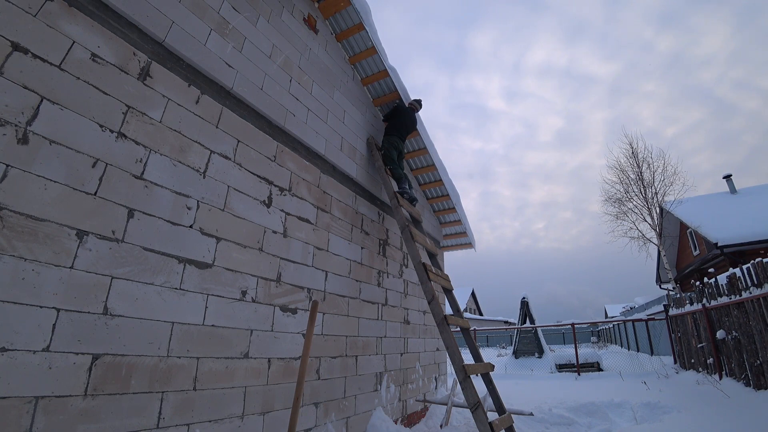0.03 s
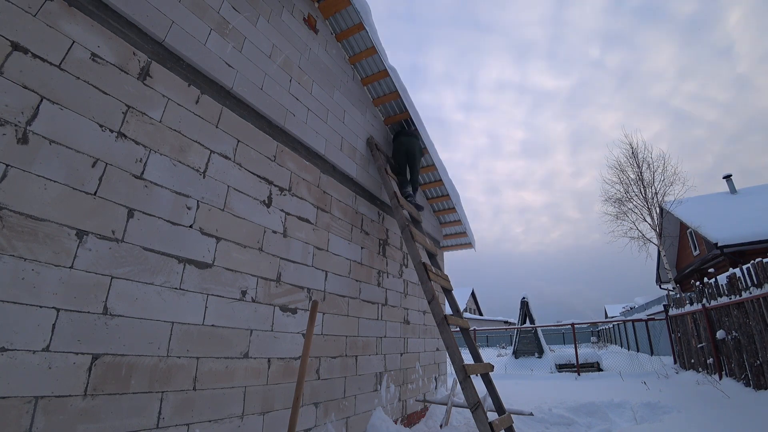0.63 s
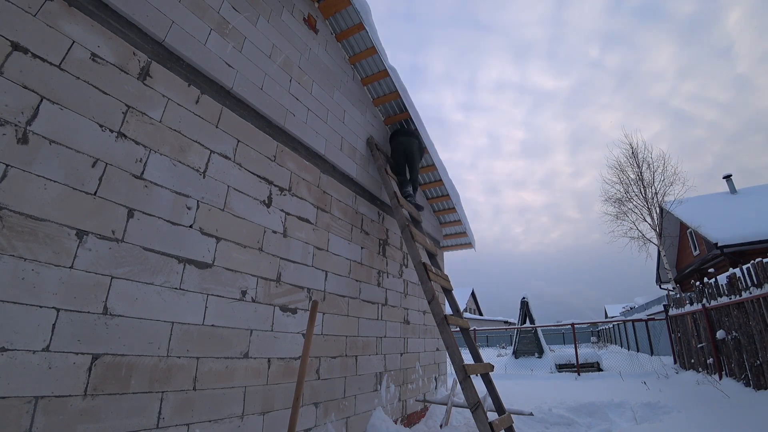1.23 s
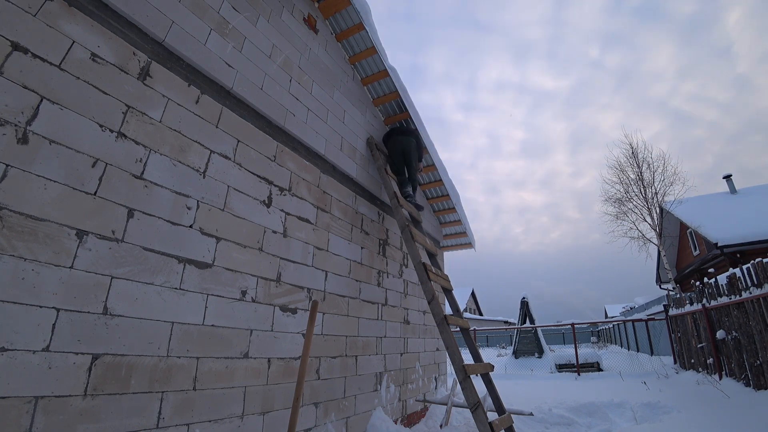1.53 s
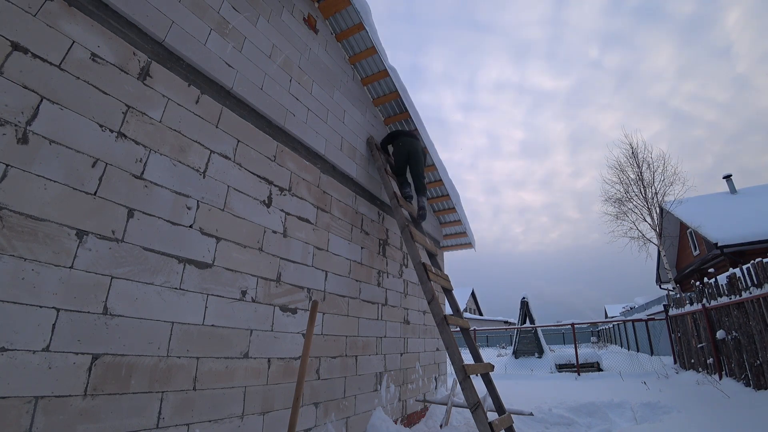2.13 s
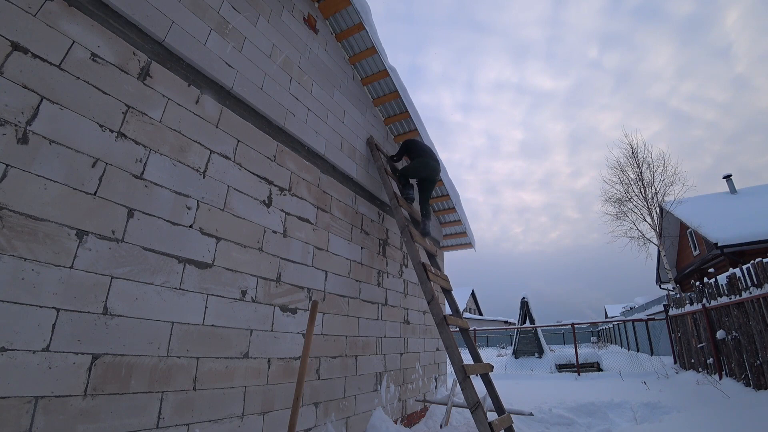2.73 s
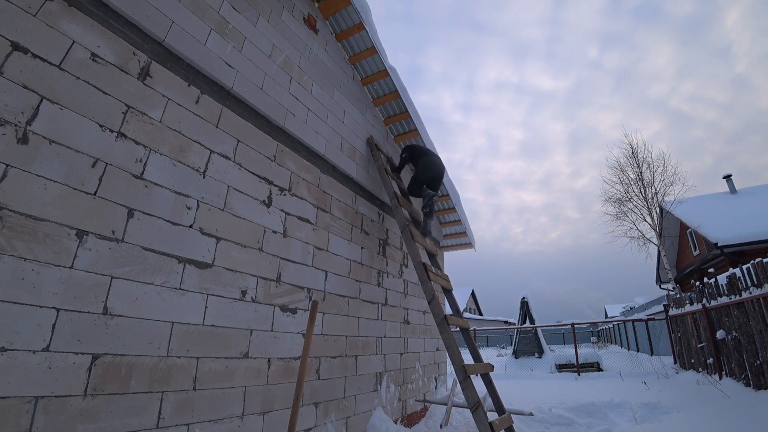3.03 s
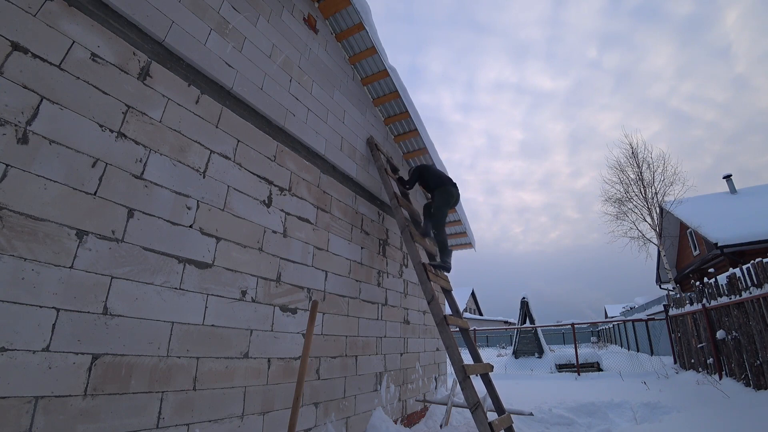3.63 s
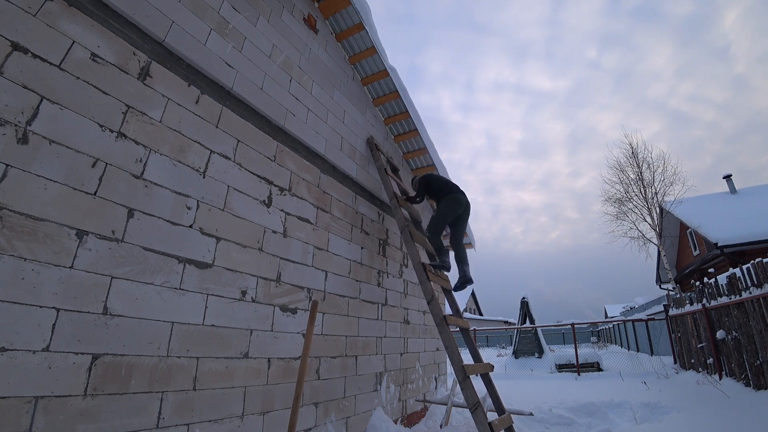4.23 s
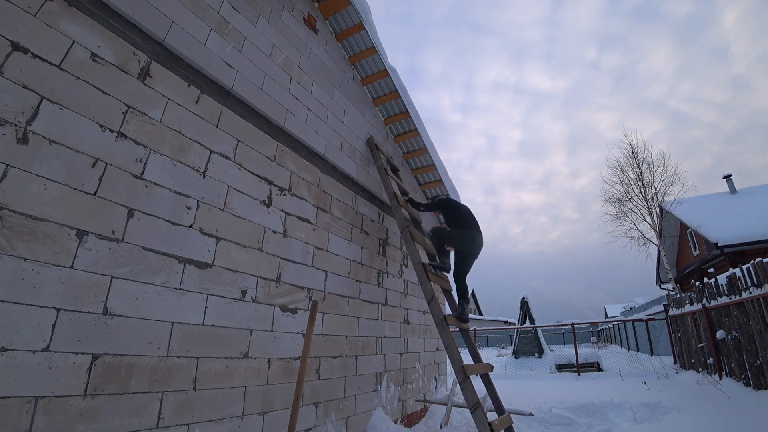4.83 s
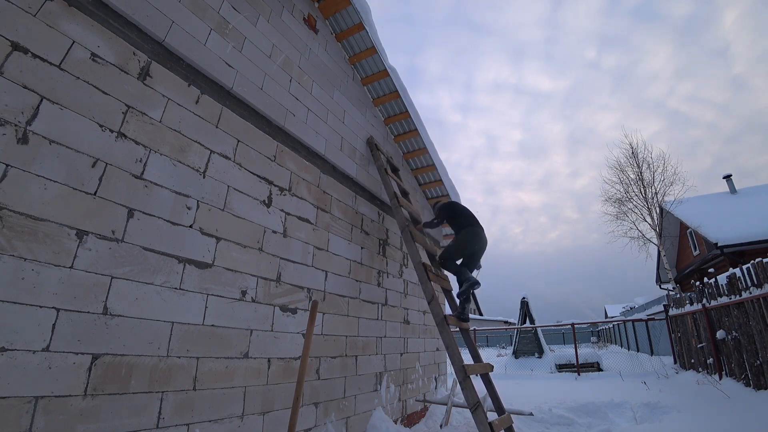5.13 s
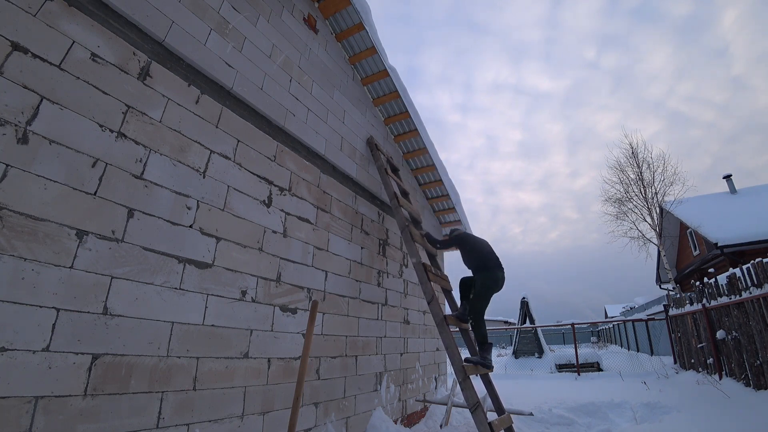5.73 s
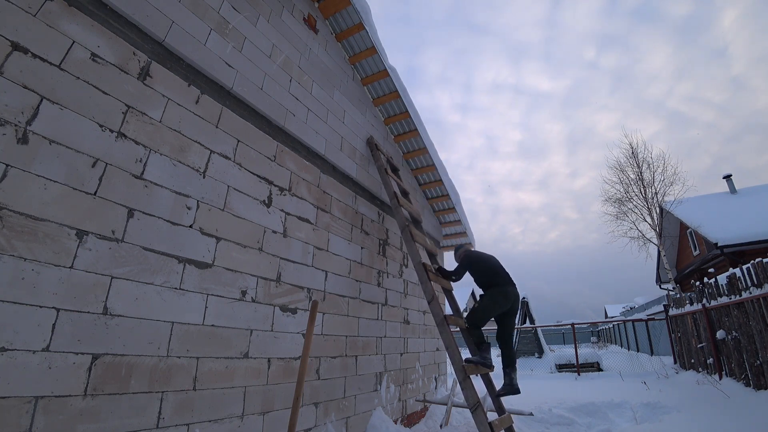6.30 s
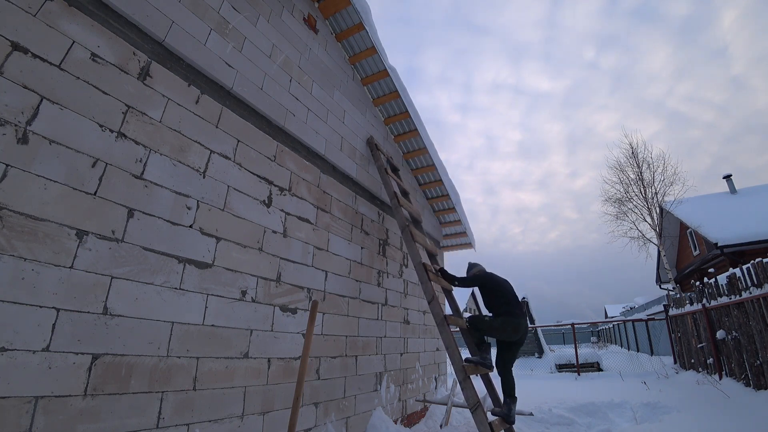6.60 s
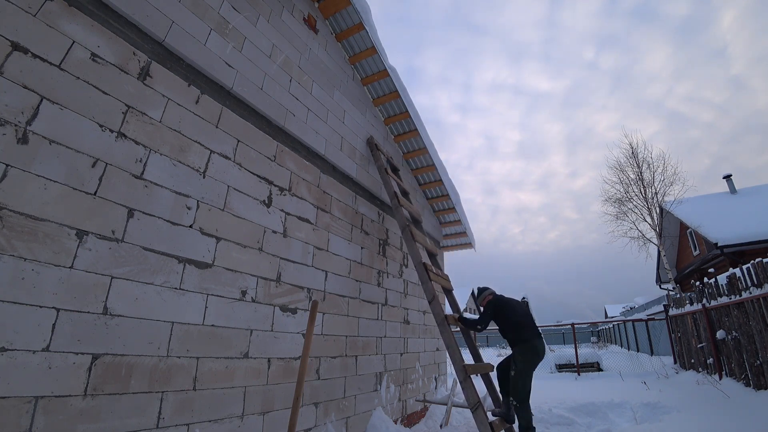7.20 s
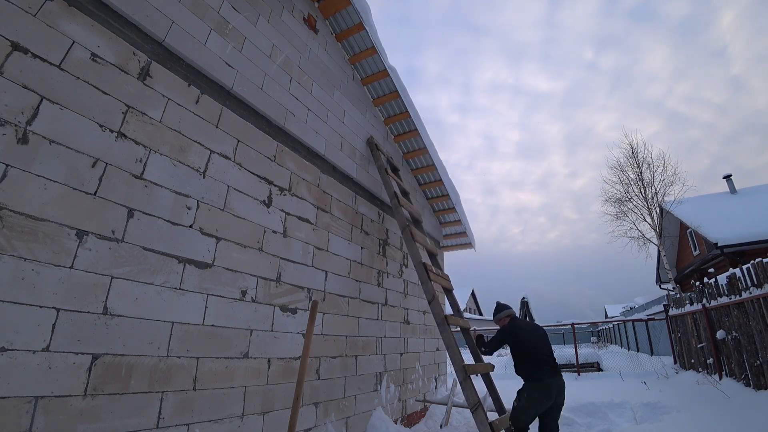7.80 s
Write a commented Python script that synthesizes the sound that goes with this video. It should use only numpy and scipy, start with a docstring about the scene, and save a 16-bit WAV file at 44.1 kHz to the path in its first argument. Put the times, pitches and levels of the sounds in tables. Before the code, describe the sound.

A soft rush with a thin hiss stops at about 0.4 seconds, leaving the faint, low hum of a distant village in a quiet yard. Light frost crackles and small jacket rustles follow, with a sharper snap near 1.8 seconds. From about 2.3 seconds boots come down a wooden ladder with hollow knocks and gritty scrapes. The heavier steps land near 2.9, 3.9, 5, 5.9 and 6.8 seconds. The frosty rungs give short creaks, the strongest at about 6.8 seconds. A loose buckle ticks and rattles irregularly from 2.7 to just after 7 seconds, and the jacket rustles with each move. Around 7.4 seconds a boot crunches into snow, followed by a few more wooden knocks and a small creak. At about 8 seconds snowy gloves pat together once. The sounds sit near the centre, slightly right, with quick, light echoes from a wall.

```python
"""Someone climbs down a wooden ladder that leans on a brick wall in a quiet, snowy yard.
A soft rush stops early on, leaving the far hum of a village. Frost crackles, a jacket rustles,
and from about 2 seconds boots knock, scrape and creak on the rungs while a loose buckle ticks.
Just after 7 seconds a boot crunches into the snow, and at the very end the gloves pat together."""
import sys
import numpy as np
from scipy import signal
from scipy.fft import rfft, irfft, next_fast_len
from scipy.io import wavfile

SR = 44100
rng = np.random.default_rng(int(sys.argv[2]) if len(sys.argv) > 2 else 0)


def bounce(signal):
    """Save signal as a 16-bit WAV file at the path given by the first command-line argument."""
    frames = np.transpose(np.atleast_2d(signal))
    limited = np.clip(frames, -1, 1)
    pcm = np.round(limited * 32767).astype(np.int16)
    wavfile.write(sys.argv[1], SR, pcm)


N = 355181
TIME = np.arange(N) / SR
AGE = TIME[:SR // 3]   # seconds since a short sound began


# Each row: start in seconds, then level in dB and pitch in Hz for the rails, the rung and the clack.
BOOT_KNOCKS = [(2.349, -58, 299, -43.5, 644, -46, 1140), (2.478, -51, 223, -36.5, 593, -39.5, 1000),
               (2.615, -41, 227, -41.5, 668, -61, 1090), (2.856, -36, 224, -33, 746, -53, 1090),
               (2.884, -37.5, 217, -35, 747, -40, 1100), (2.913, -38.5, 218, -37, 546, -34, 1080),
               (3.519, -42.5, 288, -36.5, 613, -34, 816), (3.892, -33, 240, -28, 585.4, -39, 1240),
               (4.612, -38, 183, -34.5, 514, -33, 1110), (4.976, -31, 226.5, -22.5, 586, -30.5, 870),
               (4.997, -36, 223.5, -35, 800, -50, 1000), (5.609, -47, 193, -32.5, 637, -38.5, 1125),
               (5.896, -54, 244, -37, 510, -35, 1076), (5.914, -37, 228, -31.5, 527, -36.5, 1280),
               (5.928, -40, 138, -39, 505, -56, 1040), (6.53, -45, 232, -41.5, 630, -55, 870),
               (6.836, -35.5, 338, -39.5, 662, -28, 1083), (7.33, -45.5, 193, -37, 710, -36, 1060),
               (7.496, -45, 188, -45, 550, -35.5, 1050), (7.514, -39.5, 174, -38.5, 543, -58, 1167),
               (7.562, -45, 188, -33.5, 705, -38, 890)]
# The tones (modes) of the side rails, a rung and the sole's hard edge on the board.
# Each row: multiple of the pitch, level in dB, seconds to fade by 60 dB (called t60).
RAIL_TONES = [(.6, -4, 0.42), (.83, 2, 0.15), (1, 6.5, 0.2), (1.21, 4, 0.04), (1.42, 5.5, 0.076)]
RUNG_TONES = [(.6, -11.5, 0.052), (.72, -9.5, 0.014), (.87, -13, 0.16), (1, 0, 0.072), (1.13, -8, .06),
              (1.27, -10, 0.096), (1.39, -11, 0.096)]
CLACK_TONES = [(.88, -3.5, 0.012), (1, 2.5, 0.023), (1.1, -7, 0.027), (1.22, -6.5, 0.049),
               (1.33, -24.5, 0.017), (1.5, -6, 0.021)]

def knocks():
    """The sole's edge clacks, the rung rings, and the heavy rails answer a little later."""
    out = np.zeros(N)
    for start, rail_db, rail_hz, rung_db, rung_hz, clack_db, clack_hz in BOOT_KNOCKS:
        rails = strike(RAIL_TONES, rail_hz, settle_s=0.0091, crumble_db=3.5, rise_s=0.0064)
        rung = strike(RUNG_TONES, rung_hz, settle_s=0.0081, crumble_db=2, rise_s=0.0026)
        clack = strike(CLACK_TONES, clack_hz, settle_s=0.016, crumble_db=15, rise_s=0.00058)
        add(out, start, from_db(rail_db) * rails + from_db(rung_db) * rung + from_db(clack_db) * clack)
    return out


# Weight comes onto a rung. Each row: time of full weight in seconds, level in dB, rung pitch in Hz.
RUNG_LOADS = [(2.865, -37.5, 769), (3.893, -33, 629), (4.976, -32, 580), (5.915, -37.5, 535),
              (6.838, -37, 632), (7.566, -50, 777)]

def grinding(swell_s=0.023, release_s=0.009, rail_hz=224, rail_db=-4):
    """Snow grinds between sole and rung as the weight comes on, swelling up to the thud."""
    out = np.zeros(N)
    from_peak = AGE - AGE.mean()
    swell = np.exp(np.minimum(from_peak / swell_s, -from_peak / release_s))
    for peak_s, level_db, rung_hz in RUNG_LOADS:
        slips = grains(len(AGE), per_s=1300, spread_db=5.5) * swell
        rung = ring_wood(slips, RUNG_TONES, rung_hz)
        rails = ring_wood(slips, RAIL_TONES, rail_hz)
        add(out, peak_s + from_peak[0], from_db(level_db) * (rung + from_db(rail_db) * rails))
    return out


# Each row: start in seconds, level in dB, pitch in Hz, rise time and fade time in seconds.
SOLE_CREAKS = [(2.832, -34.5, 1638, 0.04, 0.17), (3.645, -49.5, 1140, 0.0081, 0.06),
               (5.483, -38.5, 1303, 0.00065, 0.28), (5.96, -43.5, 1272, 0.0087, 0.54),
               (6.822, -24.5, 1184, 0.0049, 0.24), (6.88, -41.5, 1177, 0.015, 0.74),
               (7.659, -46.5, 1217, 0.021, 0.13)]
# The creaking board. Each row: multiple of the pitch, level in dB, fade time in seconds.
CREAK_TONES = [(.91, 4, 0.15), (0.999, 14.5, 0.047), (1.1, -16, 0.094), (1.35, -15, .05), (2, -23, 0.081),
               (3.85, -20, .02)]

def creaks():
    """A sole judders on a frosty board, and its uneven slips keep the wood ringing."""
    out, age = np.zeros(N), TIME[:SR // 2]
    for start, level_db, pitch_hz, rise_s, t60 in SOLE_CREAKS:
        envelope = (1 - np.exp(-age / rise_s)) ** 2 * from_db(-60 * age / t60)
        slips = grains(len(age), per_s=720, spread_db=4) * envelope
        add(out, start, from_db(level_db) * ring_wood(slips, CREAK_TONES, pitch_hz))
    return out


# A sole or sleeve slides over the wood.
# Each row: start and length in seconds, then scrape level, cloth level and swell in dB.
SLIDE_MOVES = [(1.137, .055, -56.5, -57, 9), (1.28, .03, -60, -63, 2), (1.551, 0.15, -52.5, -55.5, -2),
               (2.155, .06, -69.5, -61.5, 15.5), (2.361, .22, -54.5, -53.5, 3),
               (2.597, 0.024, -37.5, -38, -4), (2.646, 0.16, -59, -58.5, -8), (2.781, 0.11, -46, -49.5, 21),
               (3.526, .09, -59, -60, -4), (3.639, 0.021, -48.5, -61, 2), (3.756, 0.068, -47.5, -49.5, 3.5),
               (3.855, 0.042, -39, -44, 4), (3.92, .2, -65, -66.5, 5), (4.618, 0.14, -50, -55, -7),
               (4.735, 0.023, -35.5, -43, 2.5), (4.786, 0.14, -40, -53, -7), (4.902, 0.085, -39.5, -43, 4),
               (5.481, 0.089, -40.5, -48, -10), (5.558, 0.1, -45, -55.5, -5), (5.78, 0.15, -44, -49, 10),
               (5.96, 0.02, -35, -50, 2), (6.521, 0.11, -47, -48.5, 11), (6.599, 0.11, -38, -42.5, 2),
               (6.727, 0.15, -35.5, -44, 3), (7.008, 0.19, -54.5, -61.5, -21), (7.229, 0.11, -49, -55, 21),
               (7.333, .11, -43, -46.5, 4), (7.485, .085, -39.5, -46, 4), (7.644, 0.071, -50.5, -58.5, 0),
               (7.867, 0.14, -60.5, -51, 1)]
# The tone colours of scraped wood and of cloth. Each row: frequency in Hz, level in dB.
WOOD_COLOUR = [(150, -36), (400, -9.5), (750, -1.5), (1050, 2.5), (1250, -0.5), (1600, 1), (2000, -5.5),
               (2600, -5.5), (3600, -12), (6000, -19), (14000, -55.5)]
CLOTH_COLOUR = [(500, -58), (1500, 2.5), (3800, -3.5), (5500, -0.5), (8000, -2), (10500, -8.5),
                (13000, -13.5), (16000, -22)]

def rubbing(resting_scrape_db=-73.5, resting_cloth_db=-74.5):
    """Soles stick and slip on frosty wood; the jacket, never quite still, has a finer, brighter grain."""
    scrape_power = np.full(N, from_db(resting_scrape_db) ** 2)
    cloth_power = np.full(N, from_db(resting_cloth_db) ** 2)
    for start, length, scrape_db, cloth_db, swell_db in SLIDE_MOVES:
        gain = slide_gain(length, swell_db)
        add(scrape_power, start, (from_db(scrape_db) * gain) ** 2)
        add(cloth_power, start, (from_db(cloth_db) * gain) ** 2)
    catching = flutter(per_s=130, depth_db=3.6)
    slips = grains(N, per_s=1600, spread_db=1.5) * catching
    fibres = grains(N, per_s=5000, spread_db=6.5) * catching
    scrape = np.sqrt(scrape_power) * rms_one(colour(slips, WOOD_COLOUR))
    rustle = np.sqrt(cloth_power) * rms_one(colour(fibres + 0.83 * slips, CLOTH_COLOUR))
    return scrape, rustle


def slide_gain(length, swell_db, attack_s=0.0086, release_t60=0.14):
    """A slide grips quickly, swells or fades as the pressure changes, then lets go."""
    age = TIME[:SR]
    pressure_db = swell_db * (np.minimum(age / length, 1) - .5)
    release_db = -60 * np.maximum(age - length, 0) / release_t60
    return (1 - np.exp(-age / attack_s)) * from_db(pressure_db + release_db)


def flutter(per_s, depth_db):
    """A level that wanders at random, as a sliding surface catches and lets go."""
    points = np.clip(rng.standard_normal(int(TIME[-1] * per_s) + 2), -2, 2)
    wander = np.interp(TIME * per_s, np.arange(len(points)), points)
    return rms_one(from_db(depth_db * wander))


# Each row: start in seconds, level in dB.
BUCKLE_TICKS = [(2.7172, -33.5), (2.7761, -31), (2.9607, -34.5), (3.066, -34.5), (3.2456, -31),
                (3.433, -31.5), (3.716, -30), (3.8494, -27.5), (3.9633, -32), (4.0388, -31), (4.15, -27),
                (5.067, -33), (5.3555, -31), (5.7352, -34), (5.9617, -27.5), (6.0833, -31), (6.1823, -24.5),
                (6.2784, -30), (6.3688, -40.5), (6.3957, -39.5), (6.467, -31.5), (7.023, -37),
                (7.1461, -33)]
# The two touches in a tick. Each row: delay in seconds, then ring and rattle in dB relative to the tick.
BUCKLE_TOUCHES = [(.001, -26, -21), (.0052, -23.5, -18)]
# The hollow rattle. Each row: frequency in Hz before retuning, level in dB, fade time in seconds.
RATTLE_TONES = [(248, -2.5, 0.047), (417, -10.5, 0.014), (672, 1, 0.018), (950, -1, 0.016),
                (1363, 0.5, 0.02), (1736, -0.5, 0.013), (2430, 2, 0.0057), (2600, 3.5, 0.0077),
                (3600, 0.5, 0.006)]
# The bright ring. Each row: frequency in Hz, level in dB.
RING_COLOUR = [(2000, -25), (4200, -3), (5300, 0.5), (6000, 2.5), (6900, 1), (8000, -1.5), (9000, 0),
               (10400, -3), (11400, -10.5), (13000, -9), (16000, -18)]

def buckle(ping_db=-23.5):
    """A loose buckle swings against the climber: its thin tongue pings and its body rattles twice."""
    tongue_tones = [(8820, 0, 0.0068), (9280, -1, 0.0067), (10400, -0.92, 0.0072)]   # as in RATTLE_TONES
    out = np.zeros(N)
    for start, level_db in BUCKLE_TICKS:
        tuning = 0.948 * (1 + .05 * rng.standard_normal())   # never twice quite alike
        ping = strike(tongue_tones, pitch=0.97, settle_s=0.0015, crumble_db=-13, rise_s=0.0001)
        add(out, start + BUCKLE_TOUCHES[0][0], from_db(level_db + ping_db) * ping)
        for delay, ring_db, rattle_db in BUCKLE_TOUCHES:
            ring = crackle(RING_COLOUR, settle_s=0.012, crumble_db=-3.5, per_s=6900)
            rattle = strike(RATTLE_TONES, tuning, settle_s=0.012, crumble_db=3, rise_s=0.00014)
            touch = from_db(ring_db) * ring + from_db(rattle_db) * rattle
            add(out, start + delay, from_db(level_db) * touch)
    return out


# Each row: start in seconds, level of the crack in dB, level of the wood's answer in dB.
FROST_SNAPS = [(.532, -63.5, -58.5), (1.085, -57, -55.5), (1.102, -48, -48), (1.286, -61.5, -53),
               (1.41, -67.5, -61), (1.46, -59, -55.5), (1.685, -56, -57), (1.769, -36, -49.5),
               (1.781, -58, -57.5), (1.811, -74, -59), (2.351, -48, -45.5), (2.372, -55.5, -49.5),
               (2.407, -53.5, -51.5), (2.615, -35.5, -36.5), (2.916, -46, -43.5), (3.774, -48, -43.5),
               (4.402, -76, -56.5), (4.612, -46.5, -40.5), (4.749, -42, -43), (4.901, -48.5, -44),
               (5.484, -49.5, -46.5), (5.888, -50, -40.5), (6.601, -45.5, -45), (6.666, -49, -42.5),
               (7.408, -50, -37.5), (7.494, -43.5, -39.5), (7.961, -48.5, -54)]
# A crack's tone colour before it is tilted. Each row: frequency in Hz, level in dB.
FROST_COLOUR = [(1000, -12.5), (3000, -10.5), (5000, -2.5), (8000, -1.5), (10300, -1.5), (12500, -7),
                (16000, -16)]

def frost():
    """Frost breaks under the weight in a spray of cracks; the less the wood takes up, the brighter."""
    out = np.zeros(N)
    for start, crack_db, wood_db in FROST_SNAPS:
        db_per_octave = -3.5 + 0.71 * (crack_db - wood_db)
        tilted = [(hz, db + db_per_octave * np.log2(hz / FROST_COLOUR[0][0])) for hz, db in FROST_COLOUR]
        crack = crackle(tilted, settle_s=.006, crumble_db=8, per_s=3500)
        wood = crackle(WOOD_COLOUR, settle_s=0.018, crumble_db=14, per_s=2000)
        add(out, start, from_db(crack_db) * crack + from_db(wood_db) * wood)
    return out


# The step off the ladder. Each row: time in seconds, level in dB.
CRUNCH_LEVEL = [(7.29, -120), (7.32, -55), (7.355, -45), (7.378, -34), (7.415, -30), (7.435, -52),
                (7.48, -71), (7.51, -120)]
# The tone colour of snow. Each row: frequency in Hz, level in dB.
SNOW_COLOUR = [(300, -14), (1000, -9.5), (2000, -12), (2750, -3.5), (3400, -8.5), (4200, -26),
               (6000, -19.5), (7500, -12.5), (10000, -23), (16000, -28)]

def snow(pat_s=8.042, pat_db=-30):
    """Cold snow crunches as it packs under the boot; snowy gloves meet with the same dry crunch."""
    crunch = colour(grains(N, per_s=1600, spread_db=4), SNOW_COLOUR)
    out = from_db(in_time(CRUNCH_LEVEL)) * rms_one(crunch)
    glove_pat = crackle(SNOW_COLOUR, settle_s=.012, crumble_db=12, per_s=6000)
    add(out, pat_s, from_db(pat_db) * glove_pat)
    return out


# The tone colour of the echoes. Each row: frequency in Hz, level in dB.
REFLECTION_COLOUR = [(100, -7.5), (500, 7.5), (1200, 1.5), (2600, 4.5), (6000, 5.5), (16000, 3.5)]

def echoes(first_s, t60, side_db):
    """A fading stereo spray of reflections."""
    fade = (AGE > first_s) * from_db(-60 * AGE / t60)
    sprays = [unit_energy(grains(len(AGE), per_s=5000, spread_db=6.5) * fade) for _ in range(2)]
    mid, side = [colour(spray, REFLECTION_COLOUR) for spray in sprays]
    return stereo(mid, side, side_db)


def yard(sound, tail_db, wall_db=-11.5):
    """Quick echoes from wall and eaves, then a faint tail; their pattern changes as the climber moves."""
    out, hop = np.array([sound, sound]), SR // 4
    for centre in range(0, N + hop, hop):
        at = np.arange(max(centre - hop, 0), min(centre + hop, N))
        stretch = sound[at] * np.cos(np.pi / 2 * (at - centre) / hop)   # blends into its neighbours
        wall = from_db(wall_db) * echoes(first_s=0.00051, t60=0.062, side_db=3.5)
        tail = from_db(tail_db) * echoes(first_s=.012, t60=0.39, side_db=1)
        for channel, reflections in zip(out, wall + tail):
            add(channel, at[0] / SR, signal.fftconvolve(stretch, reflections))
    return out


# Each row: time in seconds, level in dB.
RUSH_FADE = [(0, -50), (.3, -51), (.375, -51), (.41, -90)]
# Each row: frequency in Hz, level in dB.
RUSH_COLOUR = [(20, 13), (40, -5), (70, -16), (160, 3), (300, -0.5), (700, -5), (1500, -19), (4300, -31.5),
               (5000, -16.5), (5700, -46), (16000, -39)]

def rush():
    """A soft rush with a thin hiss that stops early on."""
    return from_db(in_time(RUSH_FADE)) * steady_noise(RUSH_COLOUR, side_db=2)


# Each row: frequency in Hz, level in dB.
VILLAGE_COLOUR = [(12, -52), (20, 1.5), (48, -12.5), (154, -10), (248, -4), (285, -6), (446, -6.5),
                  (499, -10), (624, -10), (923, -21), (1440, -27), (1760, -29), (2020, -27.5), (2460, -30),
                  (16000, -36.5)]

def village_hum(level_db=-55):
    """The far village fills the yard with a low, steady noise."""
    return from_db(level_db) * steady_noise(VILLAGE_COLOUR, side_db=10.5)


def steady_noise(spectrum, side_db):
    """Smooth stereo noise with an average (rms) level of 1."""
    mid, side = [colour(white, spectrum) for white in rng.standard_normal((2, N))]
    return rms_one(stereo(mid, side, side_db))


# Each row: frequency in Hz, level in dB of the part that differs between left and right.
STEREO_WIDTH = [(100, -25), (300, -21), (600, -15), (1100, -3.5), (2200, -3), (4500, -8.5), (16000, -10.5)]

def stereo(mid, side, side_db):
    """Make left and right alike in the bass and unlike in the treble."""
    return mid + from_db(side_db) * colour(side, STEREO_WIDTH) * [[1], [-1]]


def grains(size, per_s, spread_db):
    """Tiny slips and breaks: random clicks of uneven strength."""
    born = rng.random(size) < per_s / SR
    strength = from_db(spread_db * np.minimum(rng.exponential(1, size), 3))
    return rms_one(born * strength * rng.choice([-1, 1], size))


def contact(settle_s, crumble_db, per_s):
    """A first touch, then a dying spray of clicks (at crumble_db) as the surfaces settle."""
    settling = grains(len(AGE), per_s, spread_db=3) * np.exp(-AGE / settle_s)
    force = from_db(crumble_db) * unit_energy(settling)
    force[0] += 1
    return force


def crackle(spectrum, settle_s, crumble_db, per_s):
    """A contact with the tone colour of a material."""
    return unit_burst(colour(contact(settle_s, crumble_db, per_s), spectrum))


def strike(tones, pitch, settle_s, crumble_db, rise_s):
    """A settling contact sets each tone ringing; a soft sole lets the sound build up gradually."""
    out = 0
    for ratio, db, t60 in tones:
        ring = np.sin(2 * np.pi * ratio * pitch * AGE) * from_db(-60 * AGE / t60)
        driven = signal.fftconvolve(contact(settle_s, crumble_db, per_s=1500), ring)[:len(AGE)]
        out = out + from_db(db) * unit_energy(driven) * rng.choice([-1, 1])
    return unit_burst(out * (1 - np.exp(-AGE / rise_s)))


def ring_wood(slips, tones, pitch):
    """Every slip sets off the same fading tones in the wood."""
    ring = sum(np.sin(2 * np.pi * ratio * pitch * AGE) * from_db(db - 60 * AGE / t60)
               for ratio, db, t60 in tones)
    return unit_burst(signal.fftconvolve(slips, ring))


def thin_bass(x, lowest_hz=125):
    """Thin out the deep bass below about 125 Hz."""
    return signal.sosfilt(signal.butter(2, lowest_hz, "high", fs=SR, output="sos"), x)


def colour(x, spectrum):
    """Give a sound a tone colour, using a minimum-phase filter: nothing rings before its cause."""
    size = 2 * next_fast_len(len(x))
    hz, db = np.transpose(spectrum)
    grid = np.maximum(np.fft.rfftfreq(size, 1 / SR), 1)
    gain = from_db(np.interp(np.log(grid), np.log(hz), db))
    cepstrum = irfft(np.log(gain))
    cepstrum[1:size // 2] *= 2
    cepstrum[size // 2 + 1:] = 0
    return irfft(rfft(x, size) * np.exp(rfft(cepstrum)))[:len(x)]


def from_db(db):
    return 10 ** (np.asarray(db) / 20)


def rms_one(x):
    return x / np.sqrt(np.mean(x ** 2) + 1e-20)


def unit_energy(x):
    return x / np.sqrt(np.sum(x ** 2) + 1e-20)


def unit_burst(x):
    """Scale a short sound to the energy of 20 ms at level 1."""
    return unit_energy(x) * np.sqrt(SR / 50)


def in_time(rows):
    """Join (seconds, value) points with straight lines."""
    return np.interp(TIME, *np.transpose(rows))


def add(track, start_s, sound):
    """Mix a sound into a track."""
    at = max(round(start_s * SR), 0)
    track[at:at + len(sound)] += sound[:max(N - at, 0)]


# Where the boots are. Each row: time in seconds, left level minus right level in dB.
BOOT_PAN = [(0, -0.5), (4, -1), (5, -1), (5.7, -1.4), (6.7, -2), (8, -1.5)]

def scene():
    """The climber in the yard, over the village hum; the boots drift right as they come down."""
    scrape, rustle = rubbing()
    boots = thin_bass(knocks() + grinding()) + creaks() + scrape + snow()
    boots = yard(boots, tail_db=-17.5) * from_db(in_time(BOOT_PAN) * [[.5], [-.5]])
    small_sounds = yard(rustle + buckle() + frost(), tail_db=-20) * from_db([[-.6], [.1]])
    return boots + small_sounds + village_hum() + rush()


def record(dry, cutoff_hz=16000):
    """The highest treble is cut steeply."""
    return signal.sosfilt(signal.ellip(10, .2, 80, cutoff_hz, fs=SR, output="sos"), dry)


dry = scene()
out = record(dry)
bounce(out)
```